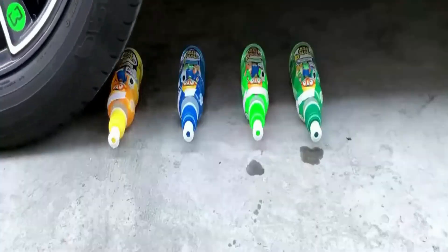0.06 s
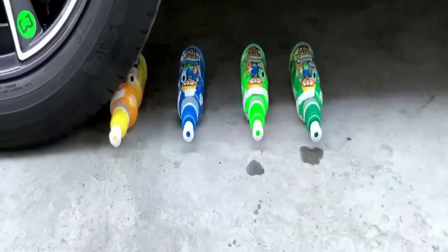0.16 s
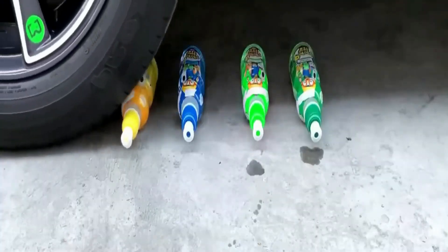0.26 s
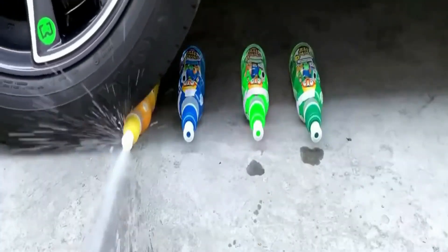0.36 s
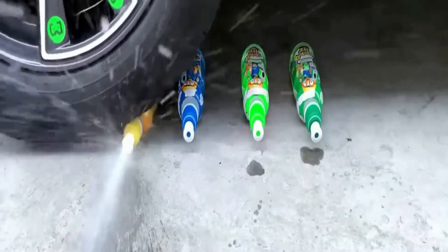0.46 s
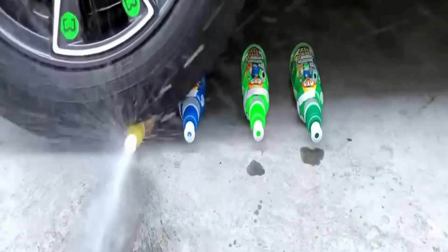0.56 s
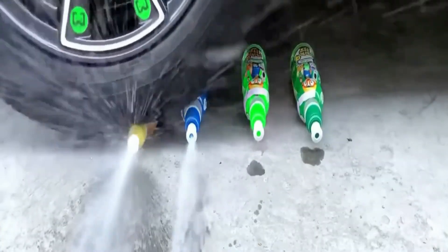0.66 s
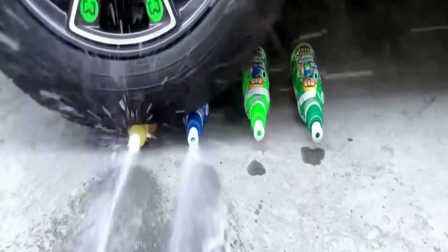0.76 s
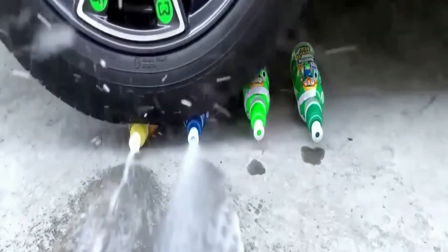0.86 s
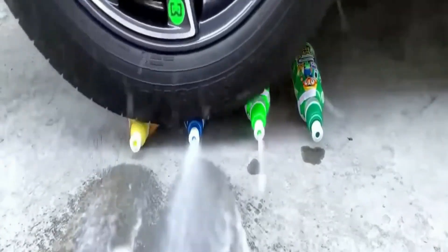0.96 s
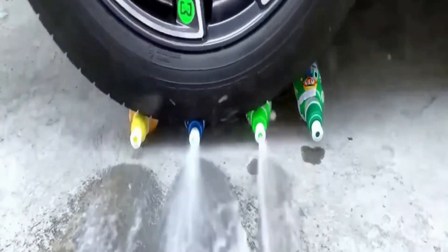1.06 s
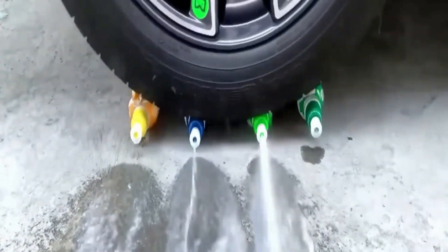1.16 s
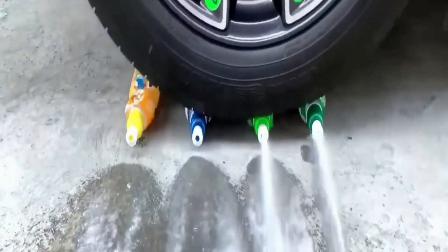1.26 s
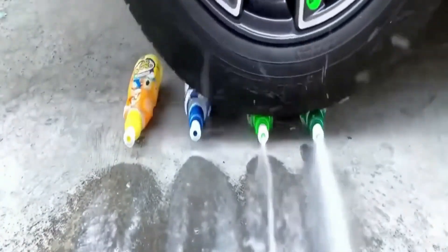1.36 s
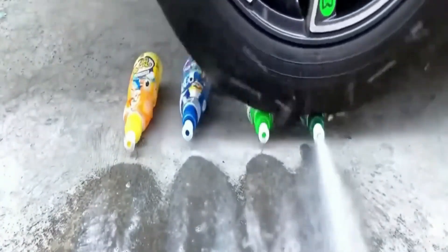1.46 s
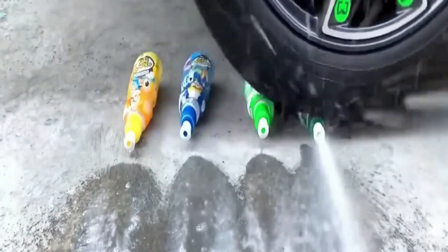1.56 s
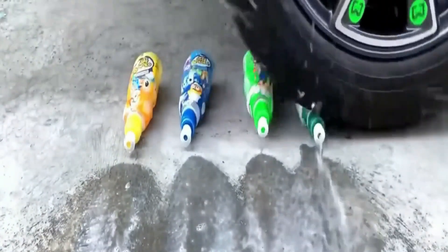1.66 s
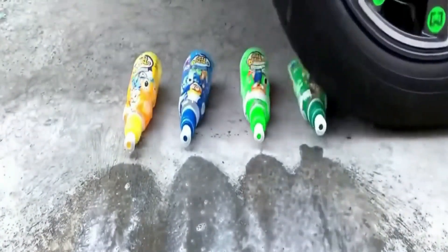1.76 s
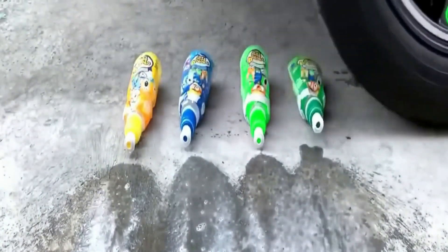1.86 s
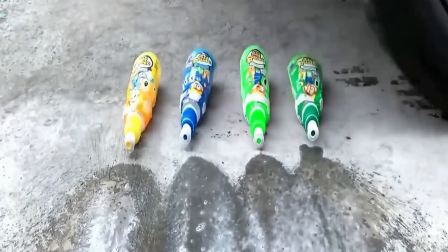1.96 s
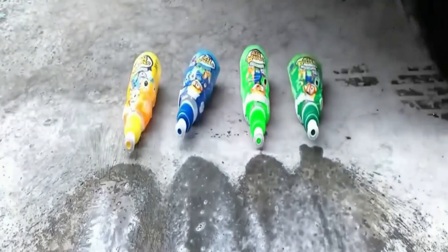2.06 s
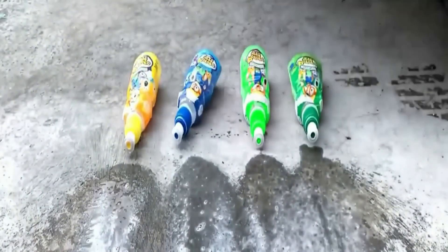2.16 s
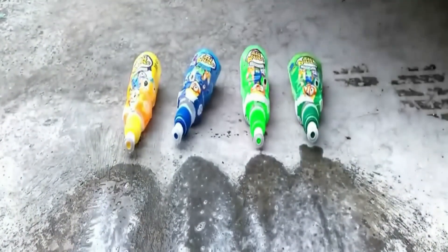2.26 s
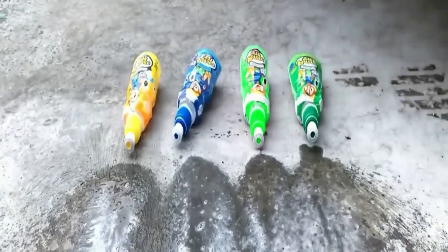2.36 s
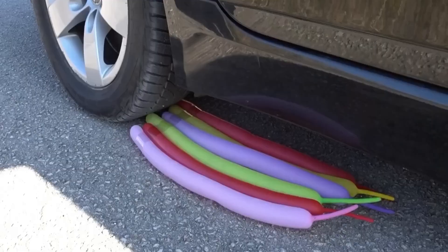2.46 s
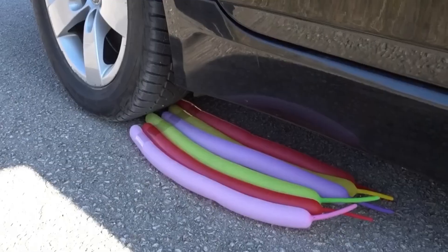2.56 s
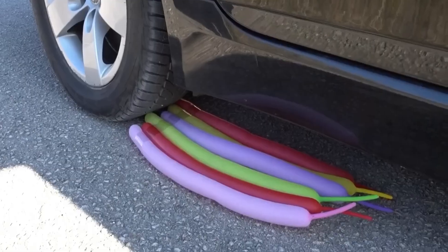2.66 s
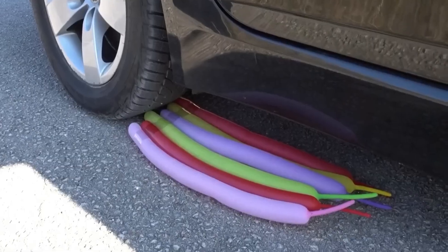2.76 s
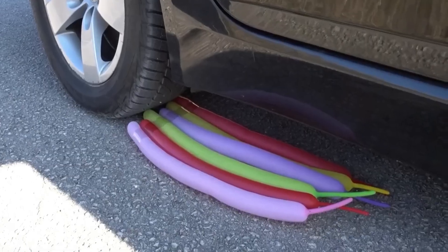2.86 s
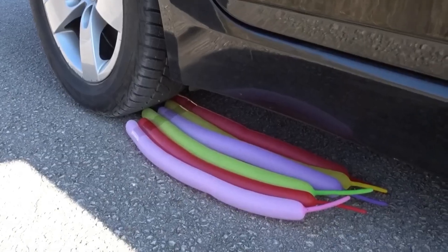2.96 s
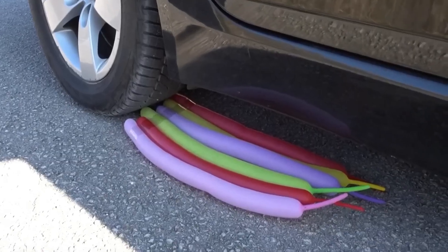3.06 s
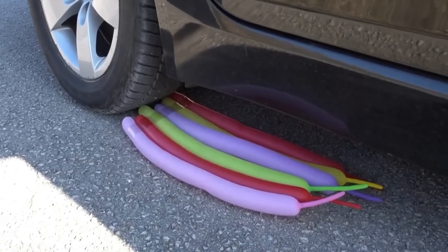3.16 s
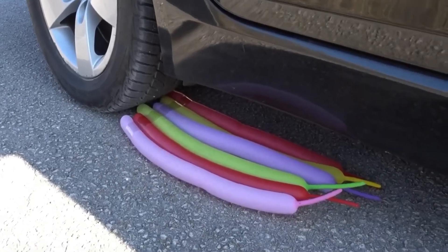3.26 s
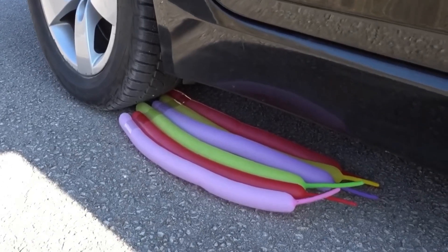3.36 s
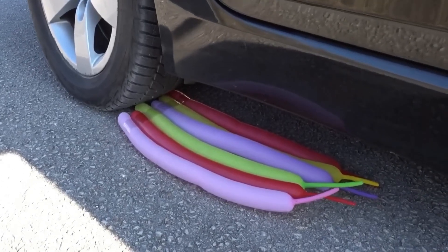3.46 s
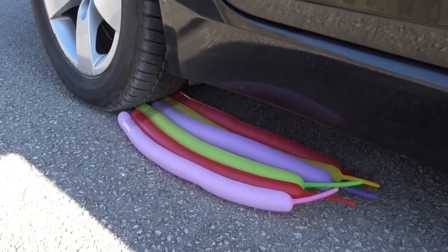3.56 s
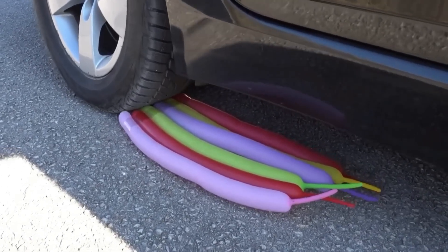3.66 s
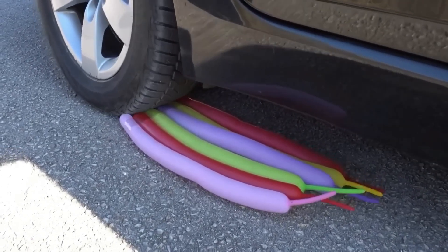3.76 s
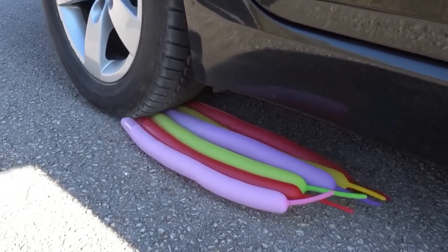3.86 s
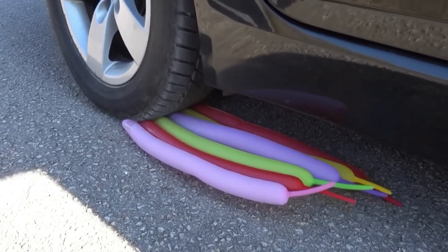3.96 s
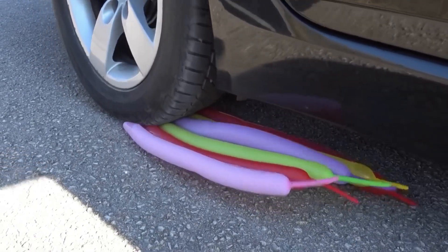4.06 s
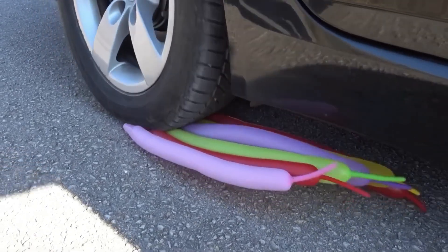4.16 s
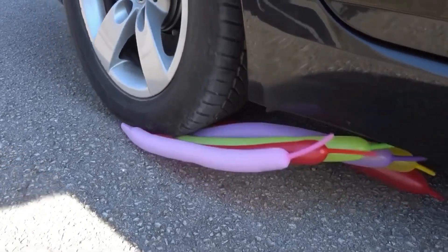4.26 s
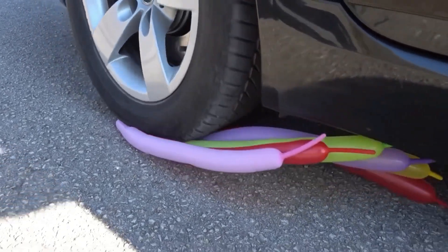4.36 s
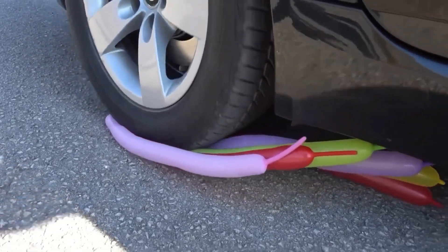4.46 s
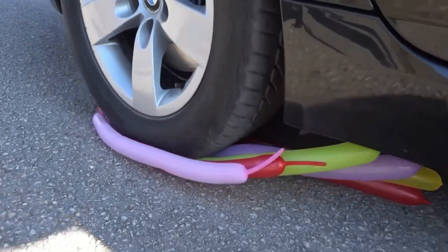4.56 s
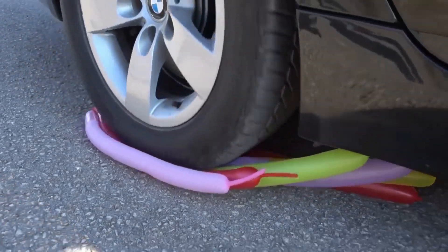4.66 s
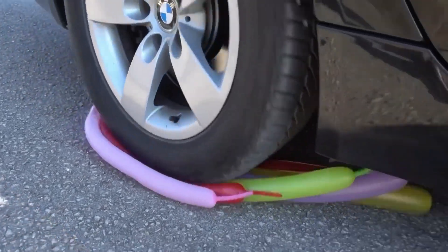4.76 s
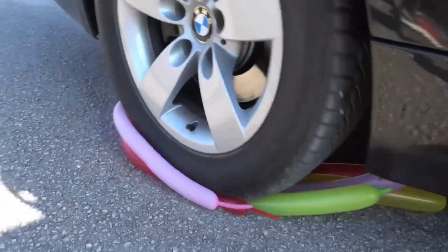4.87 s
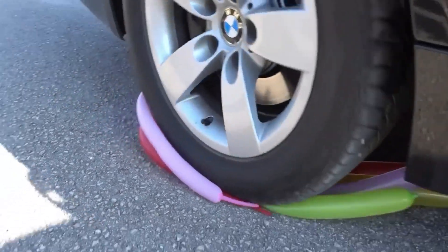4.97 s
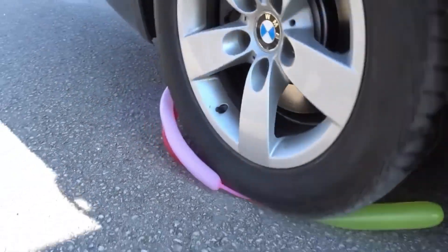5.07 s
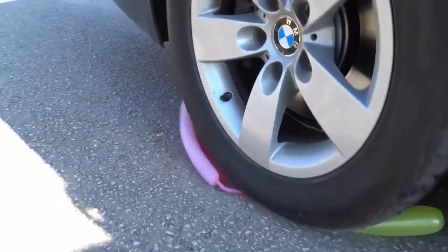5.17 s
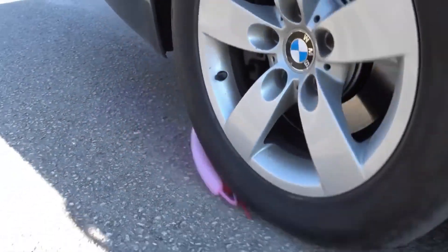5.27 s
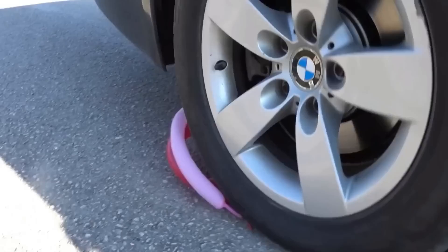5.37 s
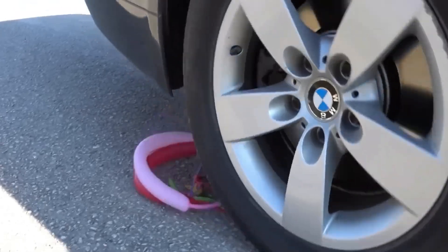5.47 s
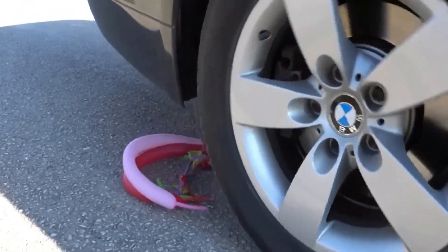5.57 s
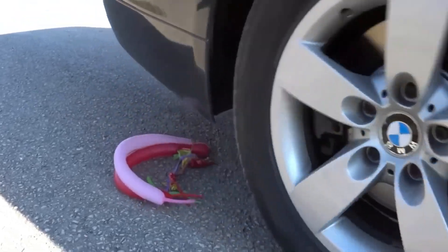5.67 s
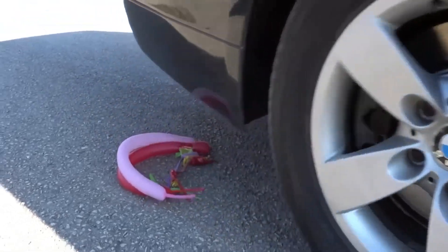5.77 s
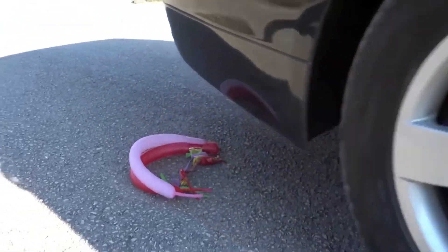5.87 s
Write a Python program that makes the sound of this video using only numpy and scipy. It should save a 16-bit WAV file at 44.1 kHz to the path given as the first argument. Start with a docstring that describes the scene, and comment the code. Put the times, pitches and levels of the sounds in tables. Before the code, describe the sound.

Close to the microphone, an engine idles and a tyre rumbles over four plastic drink bottles, which crack, hiss, gurgle and spatter on concrete in turn. An abrupt cut leads to a quieter outdoor place with wind buffeting the microphone; the tyre drags long balloons over asphalt with rasping, squeaks and a rising and falling squeal, then several pops.

```python
"""An idling engine and a rumbling tyre stand close to the microphone, outdoors; then four plastic drink bottles
crack under the tread, ring, squirt, gurgle and spatter on concrete. After a cut, wind eddies bump the
microphone and the tyre squeezes long balloons that rub, squeal and burst over asphalt. Filtered noise makes
rumble, hiss and thuds; gliding sines make squeals, bubbles and eddies; stick-slip pulses make the rubbing."""
import sys
import numpy as np
from scipy import signal
from scipy.fft import rfft, irfft
from scipy.io import wavfile

SR = 44100
rng = np.random.default_rng(int(sys.argv[2]) if len(sys.argv) > 2 else 0)


def to_wav(s):
    """Save 16-bit WAV."""
    ch = np.atleast_2d(s).T  # columns
    pcm = np.round(np.clip(ch, -1, 1) * 32767)  # PCM
    wavfile.write(sys.argv[1], SR, pcm.astype(np.int16))


N = 261072
T = np.arange(N) / SR
CUT_S = 2.455  # from the bottles to the balloons

# one squirt for each bottle: start_s, length_s, mist_db, spatter_db, gurgle_db (relative), gurgle_hz
SQUIRTS = [(0.421, 0.46, -19.5, -26, -24.5, 997), (0.601, 0.24, -45, -24.5, -19, 1592),
           (0.889, 0.46, -19, -23, -21, 1148), (1.164, 0.65, -20, -25.5, -23.5, 998)]
# plastic buckling under the tread: start_s, relative_db, body_hz
CRACKS = [(.313, -31, 458), (.376, -34, 850), (.409, -18, 668), (.422, -16, 680), (.461, -20, 654),
          (.499, -26.5, 747), (.574, -25, 580), (.865, -18, 693), (.995, -16, 1044), (1.148, -17, 957),
          (1.274, -15, 862), (1.306, -21, 700), (1.370, -23, 350), (1.46, -17.5, 443), (1.492, -23, 390),
          (1.541, -18, 772), (1.582, -23, 720), (1.642, -22, 860), (1.668, -23.5, 703), (1.712, -20.5, 760),
          (1.755, -13.5, 874), (1.782, -19, 896), (1.816, -16.5, 1343), (1.866, -16.5, 720),
          (1.872, -18, 374), (1.906, -16, 481), (1.935, -13.5, 691), (2.079, -28.5, 360), (2.108, -26, 360),
          (2.238, -41, 540)]


def undb(db):
    """Decibels to amplitude."""
    return 10 ** (np.asarray(db) / 20)


def unit(x):
    """Scale to an RMS of one."""
    return x / np.sqrt(np.mean(x ** 2) + 1e-18)


def curves(table):
    """Each column of a table joined by straight lines in time."""
    s, *columns = np.transpose(table)
    return [np.interp(T, s, c) for c in columns]


def gate(start, end, fade=0.0018):
    """One between two times, with short fades."""
    return np.clip((T - start) / fade, 0, 1) * np.clip((end - T) / fade, 0, 1)


def swell(start, rise, length, fall_db_per_s):
    """Rise, hold until the length is up, then die away."""
    fall_db = -fall_db_per_s * np.maximum(T - start - length, 0)
    return np.clip((T - start) / rise, 0, 1) * undb(fall_db)


def noise(size=N):
    """White noise, independent in the two channels."""
    return rng.standard_normal((2, size))


def walk(rate, size=N):
    """Random wander with a spread near 1, through `rate` new points a second."""
    knots = rng.standard_normal(4096)
    return unit(np.interp(T[:size] * rate, np.arange(len(knots)), knots))


def colour(x, points):
    """Shape by a (Hz, dB) spectrum that falls away beyond its ends."""
    hz, db = np.transpose(points)
    f = np.fft.rfftfreq(N, 1 / SR) + 1e-3
    skirt = np.minimum(f / hz[0], 1) ** 3 * np.minimum(hz[-1] / f, 1) ** 3
    gain = undb(np.interp(np.log(f), np.log(hz), db)) * skirt
    return unit(irfft(rfft(x) * gain, N))


def band(x, hz, spread):
    """Broad resonance from hz / spread to hz * spread."""
    spread = max(spread, 1.05)
    edges = [hz / spread, min(hz * spread, .47 * SR)]
    return unit(signal.sosfilt(signal.butter(2, edges, "band", fs=SR, output="sos"), x))


def low_pass(x, order, ripple_db, stop_db, hz):
    """Steep cut of everything above hz."""
    return signal.sosfilt(signal.ellip(order, ripple_db, stop_db, hz, fs=SR, output="sos"), x)


def add(out, s, x):
    """Mix a short sound in at time s."""
    i = max(int(s * SR), 0)
    out[..., i:i + x.shape[-1]] += x[..., :max(N - i, 0)]


def underbody(x, t60, direct=0.):
    """Dense reflections between road and car, different at each side of the microphone."""
    t = np.arange(SR // 12) / SR
    echoes = noise(len(t)) * undb(-60 * t / t60)
    echoes /= np.linalg.norm(echoes, axis=1, keepdims=True)
    echoes[:, 0] += direct
    return signal.oaconvolve(np.atleast_2d(x), echoes, axes=1)[:, :N] / np.hypot(1, direct)


def moving_underbody(x, t60, direct=0., count=3):
    """The reflection pattern keeps changing as the wheel rolls on."""
    shares = np.array([walk(22) for _ in range(count)])
    shares /= np.linalg.norm(shares, axis=0)
    return sum(share * underbody(x, t60, direct) for share in shares)


def specks(rate, scatter_db):
    """Random tiny impacts, `rate` a second on average, a few much larger than the rest."""
    hits = rng.random(N) < rate / SR
    sizes = undb(scatter_db * np.minimum(rng.exponential(size=N), 4))
    return unit(hits * rng.choice([-1, 1], N) * sizes)


def chirps(start, end, pitch_hz, spread, length, glide, glide_spread, scatter_db, count):
    """A swarm of short gliding rings scattered round a moving pitch."""
    out, age = np.zeros(N), np.linspace(0, 1, int(length * SR))
    shape = np.minimum(10 * age, 1) * undb(-30 * age)
    times, sizes = rng.uniform(start, end, count), rng.exponential(size=count)
    for when, (detune, bend), size in zip(times, rng.standard_normal((count, 2)), sizes):
        centre_hz = pitch_hz[min(int(when * SR), N - 1)]
        hz = min(centre_hz * np.exp(spread * detune), SR / 4)
        cycles = hz * length * age * (1 + (glide + glide_spread * bend) * age / 2)
        add(out, when, undb(scatter_db * min(size, 3)) * shape * np.sin(2 * np.pi * cycles))
    # unit level within the swarm's own span
    return unit(moving_underbody(out, t60=0.08)) * np.sqrt((end - start) * SR / N)


def bursts(table, spread, t60, snap_hz, snap_db, rise, tail_db, tail_t60):
    """A skin or shell gives way: a bright snap, a thud of moved air, and a short wash from under the car."""
    out, t = np.zeros((2, N)), np.arange(-SR // 20, SR // 2) / SR
    after = np.maximum(t, 0)
    decay = undb(-60 * after / t60) + undb(tail_db - 60 * after / tail_t60)
    shape = np.exp(np.minimum(t, 0) / rise) * decay
    for s, db, hz in table:
        body = band(noise(len(t)), hz, spread)
        snap = band(noise(len(t)), snap_hz, 2.27)
        add(out, s + t[0] + rise, undb(db + 3.0) * shape * (body + undb(snap_db) * snap))
    return out


def yard():
    """Distant outdoor noise; the sound of this layer turns dull above dull_hz at the end."""
    # spectrum of the outdoor noise: pitch_hz, level_db
    air_spectrum = [(15, -18.5), (25, 7), (81, -2), (178, -6.5), (480, -5.5), (685, -2), (740, 2),
                    (954, -15.5), (1400, -8), (2710, -13), (3320, -17), (4510, -17.5), (11000, -24.5),
                    (14300, -58.5), (22000, -120)]
    level_db, dull_hz, dull_start_s, dull_db_per_s = -50, 3200, 5.5, 37
    air = colour(noise() + .5 * noise()[0], air_spectrum) * undb(level_db + .5 * walk(6.1))
    low = signal.sosfiltfilt(signal.butter(3, dull_hz, fs=SR, output="sos"), air)
    return low + (air - low) * undb(-dull_db_per_s * np.maximum(T - dull_start_s, 0))


def eddies(table, lag, unrest, rush_db):
    """Each eddy is a gliding, restless pressure wave with a rush of air, reaching one port a moment late."""
    half_length_s = 0.014
    glide_scatter = 0.21  # octaves per half-length
    out, t = np.zeros((2, N)), np.arange(-SR // 8, SR // 8) / SR
    for s, db, hz in table:
        glide = glide_scatter * rng.standard_normal() * np.clip(t / half_length_s, -2, 2)
        rate = hz * 2 ** (glide + unrest * walk(199.9, size=len(t)))
        late = np.array([[lag], [0]]) * np.minimum(rate, 130)  # in cycles
        phase = 2 * np.pi * (np.cumsum(rate) / SR + rng.random() - late)
        eddy = np.sin(phase) + undb(rush_db) * band(noise(len(t)), 0.89 * hz, 1.99)
        add(out, s + t[0], undb(db) * eddy * np.exp(-(t / half_length_s) ** 2))
    return out


def wind(lag=0.0017, unrest=0.292, rush_db=-9, flutter_db=0.0, count=26):
    """Low noise flutters on the microphone throughout; strong and small eddies bump it after the cut."""
    # strong wind eddies on the microphone: peak_s, level_db, flutter_hz
    strong = [(3.365, -28, 94.6), (3.426, -19, 252), (3.445, -18.5, 123.2), (3.497, -21.5, 149.8),
              (3.547, -15, 102), (3.572, -14.5, 156.3), (3.607, -13.5, 78.3), (3.695, -10, 77.4),
              (3.705, -15.5, 192.5), (4.014, -25, 100.3), (4.315, -35.5, 278), (4.453, -16.5, 147.1),
              (4.79, -22.5, 220.5), (4.845, -24, 141.5), (4.905, -22, 199.6), (4.946, -14.5, 148.3),
              (5.042, -16.5, 257), (5.605, -16.5, 151.6), (5.705, -21.5, 170.1), (5.87, -38, 120.5),
              (5.886, -22.5, 261)]
    # strength of the breeze: time_s, level_db
    breeze = [(2.45, -41), (2.7, -65.5), (3.33, -66), (3.42, -32), (3.62, -29.5), (3.8, -36.5),
              (4.3, -36.5), (4.6, -52.5), (4.8, -30), (5.3, -36), (5.92, -30)]
    eddy_hz, eddy_db = 134.4, 8  # small eddies, level against the breeze
    breeze_db, = curves(breeze)
    flutter_spectrum = [(20, 0.0), (60, -0.5), (120, -2.5), (220, -15.5), (400, -22.5)]  # (Hz, dB)
    flutter = colour(noise() + 0.31 * noise()[0], flutter_spectrum) * undb(breeze_db + flutter_db)
    times = CUT_S + (T[-1] - CUT_S) * (np.arange(count) + rng.random(count)) / count
    weak = []
    for s, (size, detune) in zip(times, rng.standard_normal((count, 2))):
        db = np.interp(s, T, breeze_db) + eddy_db + 2.6 * size
        weak.append((s, db, eddy_hz * 2 ** (0.49 * detune)))
    return flutter + eddies(list(strong) + weak, lag, unrest, rush_db)


def engine():
    """Idling engine and belt lines waver in level and pitch, over the hiss of the engine bay."""
    # engine and belt lines: pitch_hz, level_db against the hum
    lines = [(58, -4), (112, -4), (598, -15.5), (960, -16), (1490, -20.5)]
    # spectrum of the engine bay: pitch_hz, level_db
    bay_spectrum = [(300, 0), (450, -6.5), (600, -2.5), (750, -7.5), (1100, -13.5), (1550, -10.5),
                    (2100, -16), (3200, -16), (6000, -26), (8300, -22), (15000, -30)]
    hum_db, hum_fall_db_per_s = -28.5, 8.5  # the engine moves away
    turn = np.cumsum(1 + 0.02 * walk(15)) / SR
    hum = 0
    for hz, db in lines:
        phase = 2 * np.pi * (hz * turn + rng.random((2, 1))) + .5 * walk(90)
        hum = hum + undb(db + 8.8 * np.tanh(walk(26))) * np.sin(phase)
    bay = colour(underbody(noise(), t60=0.0894, direct=0.49), bay_spectrum) * undb(-39.5 + walk(33))
    return hum * undb(hum_db - hum_fall_db_per_s * T) + bay


def tyre():
    """The tyre rumbles, dents set the air inside it ringing, and the car rocks."""
    # spectrum of the rumble: pitch_hz, level_db
    rumble_spectrum = [(18, 7.5), (32, 1.5), (50, -1.5), (100, -2), (150, -12.5), (300, -19.5),
                       (500, -22.5)]
    # dents that set the air inside the tyre ringing: start_s, level_db
    dents = [(0.404, -24.5), (0.47, -37), (1.14, -30.5), (2.04, -31), (2.229, -30)]
    rumble_db, rumble_rise_db_per_s = -30.5, 0.5  # the wheel gathers speed
    cavity_db, dent_rise_s, dent_hold_s, dent_fall_db_per_s = -40, 0.011, 0.02, 91
    sway_s, sway_hz, sway_db = 2.03, 25.9, -24.5  # the car rocks as the wheel drops off the last bottle
    rumble_level_db = rumble_db + rumble_rise_db_per_s * T + 3.9 * walk(5.4)
    rumble = colour(noise() + 0.5 * noise()[0], rumble_spectrum) * undb(rumble_level_db)
    ring = undb(cavity_db)
    for s, db in dents:
        ring = ring + undb(db) * swell(s, dent_rise_s, dent_hold_s, dent_fall_db_per_s)
    cavity = band(noise() + noise()[0], hz=202, spread=1.087) * ring
    sway = band(noise(), sway_hz, 1.31) * undb(sway_db) * swell(sway_s, 0.028, 0.33, 18)
    return rumble + sway + cavity


def rolling():
    """Tread on asphalt swells as the wheel comes near and fades as it leaves."""
    # spectrum of rolling on asphalt: pitch_hz, level_db
    tread_spectrum = [(260, -30), (450, -15), (686, -16.5), (746, -17), (905, -12.5), (2520, -14),
                      (4500, -28.5), (8000, -61), (10400, -78.5), (17600, -120)]
    tread_db, pass_s, near_db = -44, 5.44, 7  # loudest as the wheel passes
    approach_db_per_s, leave_db_per_s = 7, 31
    far_db = approach_db_per_s * np.maximum(pass_s - T, 0) + leave_db_per_s * np.maximum(T - pass_s, 0)
    level_db = tread_db + near_db - far_db + walk(30.6)
    return colour(noise(), tread_spectrum) * undb(level_db) * gate(3.0, 7, fade=0.66)


def knocks(rise=0.0027, ring_db=0):
    """Each crack rings the modes of the bottle, scaled to the body pitch of that crack."""
    # modes of a bottle: multiple of its body pitch, relative_db, t60_s
    modes = [(1, 1.5, 0.075), (1.6, -6.5, 0.08), (2.15, -5, 0.055), (3.2, -12.5, 0.075)]
    out, t = np.zeros((2, N)), np.arange(SR // 5) / SR
    for s, db, hz in CRACKS:
        for (ratio, mode_db, t60), phase in zip(modes, rng.random((len(modes), 2, 1))):
            fade = np.minimum(t / rise, 1) * undb(-60 * np.maximum(t - rise, 0) / t60)
            ring = np.sin(2 * np.pi * (hz * ratio * t + phase))
            add(out, s, undb(db + mode_db + ring_db) * fade * ring)
    return out


def plastic(click_hz=4200, crunch_db=-5):
    """The bottles crack and ring as they buckle and click as the tyre grips and frees them."""
    # bottle walls clicking as they are pinched or spring back: start_s, relative_db
    click_times = [(0.371, -39.5), (0.414, -30.5), (0.433, -30), (.497, -26), (.577, -30), (1.893, -20),
                   (1.935, -20.5), (2.06, -32), (2.102, -27), (2.157, -34), (2.238, -35.5)]
    cracks = bursts(CRACKS, spread=1.54, t60=0.11, snap_hz=3460, snap_db=-15.5,
                    rise=.003, tail_db=-27.5, tail_t60=0.26)
    clicks = bursts([(s, db, click_hz) for s, db in click_times], spread=3.25, t60=0.042, snap_hz=8050,
                    snap_db=-14, rise=0.0055, tail_db=-40, tail_t60=0.13)
    return undb(crunch_db) * cracks + knocks(ring_db=2.5) + clicks


def squirting(levels_db, rise, fall_db_per_s, lag=0.):
    """The power that each bottle puts into one part of the spray."""
    powers = []
    for (s, length, *_), db in zip(SQUIRTS, levels_db):
        powers.append((undb(db) * swell(s + lag, rise, length - lag, fall_db_per_s)) ** 2)
    return np.array(powers) + 1e-18


def spray():
    """Jets hiss as a fine mist, and their droplets spatter on the concrete."""
    # spectrum of the mist: pitch_hz, level_db
    mist_spectrum = [(5500, -17.5), (7400, -8), (8300, -5), (9500, -6), (11000, -5), (12800, -2.5),
                     (15500, -4)]
    # spectrum of the spatter: pitch_hz, level_db
    spatter_spectrum = [(1500, 3), (2000, -2), (3000, 0), (4000, -4), (5200, -6), (7000, -9.5)]
    # a jet surges as the tread presses harder: start_s, length_s, relative_db
    surges = [(0.495, .04, -20), (1.245, 0.077, -27)]
    mist_rise_s, mist_fall_db_per_s = 0.036, 121.5
    spatter_rise_s, spatter_fall_db_per_s = 0.18, 62  # drops build up more slowly than mist
    _, _, mist_db, spatter_db, _, _ = np.transpose(SQUIRTS)
    mist = np.sqrt(squirting(mist_db, mist_rise_s, mist_fall_db_per_s).sum(0))
    mist = mist + sum(undb(db - 4) * swell(s, .012, length, 220.5) for s, length, db in surges)
    spatter = np.sqrt(squirting(spatter_db, spatter_rise_s, spatter_fall_db_per_s).sum(0)) * undb(3)
    drops = unit(moving_underbody(specks(rate=2600, scatter_db=3.6), t60=.05))
    flow = undb(-10.5) * noise() + drops
    jets = colour(flow, mist_spectrum) * mist + colour(flow, spatter_spectrum) * spatter
    return jets * undb(0.35 * walk(61.3))


def hollows(swing_db=4):
    """Sputtering air rings each resonance of the half-empty bottles, swelling and drifting as walls fold."""
    # air in the half-empty bottles: pitch_hz, relative_db
    resonances = [(470, -9), (640, -4.5), (890, 0), (1080, 0.5), (1360, 1), (1560, -2), (2050, -7)]
    drift, width_hz = .032, 20
    out = 0
    for hz, db in resonances:
        phase = 2 * np.pi * np.cumsum(hz * np.exp(drift * walk(9))) / SR
        drive = np.array([walk(2 * width_hz) + 1j * walk(2 * width_hz) for _ in range(2)])
        ring = (drive * np.exp(1j * phase)).real
        out = out + ring * undb(db + swing_db * np.tanh(walk(13.77)))
    return unit(out)


def gurgle():
    """Air pockets bubble and splash through the nozzles and ring the hollow bottles in an uneven flow."""
    rise_s, fall_db_per_s = .11, 84.5
    lag_s = 0.083  # air reaches the nozzle after the liquid
    sputter_db, sputter_db_per_s = 1.1, 1  # the flow grows more uneven as the bottles empty
    gurgle_db, gurgle_hz = np.transpose(SQUIRTS)[4:]
    pockets = squirting(gurgle_db, rise_s, fall_db_per_s, lag_s)
    pitch_hz = gurgle_hz @ pockets / pockets.sum(0)  # stronger nozzles weigh more on the pitch
    bubbles = chirps(.38, 2.2, pitch_hz, spread=.32, length=.12, glide=.03, glide_spread=.06,
                     scatter_db=2.8, count=600)
    crackle = unit(underbody(specks(rate=190, scatter_db=1.2), t60=0.04))
    splash_spectrum = [(150, 1.5), (400, 1.5), (1000, -0.5), (1600, -11.0), (2200, -3.0)]  # (Hz, dB)
    splash = colour(crackle + 0.53 * noise(), splash_spectrum)
    mix = undb(-1.5) * bubbles + undb(-2.5) * splash + undb(-2) * hollows()
    sputter = undb((sputter_db + sputter_db_per_s * T) * np.tanh(walk(55)))
    return mix * np.sqrt(pockets.sum(0)) * sputter


def glugs(glug_db=-1, rise=0.0057, fall_db_per_s=500):
    """Large air pockets ring briefly in the nozzles, as narrow bands of noise."""
    # large air pockets gulping through a nozzle: start_s, length_s, relative_db, pitch_hz
    gulps = [(0.571, 0.055, -23, 940), (0.648, 0.078, -20, 1170), (0.719, 0.11, -19.5, 2070),
             (0.774, 0.052, -19.5, 1320), (0.989, .02, -16, 1075), (1.087, 0.037, -17.5, 1294),
             (1.184, 0.033, -19, 1015), (1.201, 0.023, -29, 605), (1.263, .015, -22, 1365),
             (1.317, 0.04, -25, 1000), (1.555, 0.026, -23, 1110), (1.626, 0.047, -18, 1540),
             (1.639, 0.034, -19.5, 880), (1.704, .015, -21.5, 1560), (1.76, .04, -24, 876),
             (1.773, 0.016, -24, 1500), (1.812, 0.01, -15, 1367)]
    out = 0
    for s, length, db, hz in gulps:
        out = out + band(noise(), hz, 1.035) * undb(db + glug_db) * swell(s, rise, length, fall_db_per_s)
    return out


def stick_slip(slip_hz, wander, jitter, count=5):
    """Several patches of latex catch and let go, each at its own restless rate, and share the load."""
    out, loads = 0, undb(1.8 * np.array([walk(25) for _ in range(count)]))
    for load in loads / np.linalg.norm(loads, axis=0):
        rate = slip_hz * np.exp(wander * walk(18) + jitter * walk(500))
        slips = np.diff(np.floor(np.cumsum(rate) / SR), prepend=0)
        out = out + slips * load * undb(2 * walk(400)) / np.sqrt(rate)  # quicker slips are smaller
    return out


def rubbing():
    """Slips rasp and squeak in the stretched skins, tick on grit and groan in the air inside the balloons."""
    # balloons dragged under the tread: time_s, rubbing_db
    drag = [(3.62, -54), (3.9, -39), (4.05, -29), (4.22, -32.5), (4.34, -30), (4.44, -22.5), (4.487, -20),
            (4.515, -17), (4.65, -26.5), (4.70, -19), (4.8, -19), (4.9, -17), (5.02, -21.5), (5.11, -17),
            (5.215, -31), (5.272, -24), (5.292, -16), (5.322, -16.5), (5.365, -35), (5.41, -37),
            (5.45, -35), (5.486, -35)]
    # spectrum of rubbed latex: pitch_hz, level_db
    latex_spectrum = [(1060, -23), (1800, -1.5), (2000, 3), (3320, 0), (3400, -3), (4200, 1.5),
                      (6380, -5.5), (7360, -0.5), (11000, -8), (14300, -79), (22000, -120)]
    # spectrum of the groan: pitch_hz, level_db
    groan_spectrum = [(240, 0.5), (480, 3), (750, 3), (1150, 1), (1400, -1.5), (1850, -5.5), (2400, -17.5),
                      (3000, -8)]
    # latex catching on grit: pitch_hz, relative_db
    grit_bands = [(1200, -5), (2500, 0), (4500, 1.5), (8000, -2)]
    rasp_db, release_db_per_s = 0.5, 321
    groan_db, groan_growth = -18, 0.49  # the groan gains this many dB for each dB of rubbing
    relief_db, relief_s, relief_width_s = 14, 4.553, 0.027  # rubbing eases while the skin slides and sings
    # the tread first drags a balloon over the asphalt
    scrape_s, scrape_length_s, scrape_hz, scrape_db = 3.72, 0.041, 1360, -34
    drag_db = curves(drag)[0] - relief_db * np.exp(-((T - relief_s) / relief_width_s) ** 2)
    slips = unit(moving_underbody(stick_slip(slip_hz=520.6, wander=.45, jitter=.07), t60=0.017))
    squeaks = chirps(3.6, 5.55, np.full(N, 4800.), spread=.5, length=.06, glide=0, glide_spread=.02,
                     scatter_db=2.5, count=1400)
    creaks = chirps(3.6, 5.55, np.full(N, 1700.), spread=.35, length=.08, glide=0, glide_spread=.08,
                    scatter_db=2.5, count=400)
    grit = 0
    for hz, db in grit_bands:
        ticks = moving_underbody(specks(rate=100, scatter_db=0.), t60=.025)
        grit = grit + undb(db) * band(ticks, hz, 1.4)
    skins = undb(-1.0) * colour(slips, latex_spectrum) + undb(-8.0) * colour(noise(), latex_spectrum)
    skins = skins + undb(-4.5) * squeaks + undb(-7.0) * creaks + undb(-3.5) * unit(grit)
    groan = colour(slips + undb(-13) * noise(), groan_spectrum)
    rubbed = skins * undb(rasp_db + drag_db) + groan * undb(groan_db + groan_growth * drag_db)
    stutter = undb(1.2 * walk(110) + 0.45 * walk(17))  # the bundle shifts in small jerks
    contact = swell(drag[0][0], 0.12, drag[-1][0] - drag[0][0], release_db_per_s)
    scrape = band(slips, scrape_hz, 1.7) * undb(scrape_db) * swell(scrape_s, .025, scrape_length_s, 170)
    return rubbed * stutter * contact + scrape


def sing(hz, rough, overtone_db=-7):
    """Latex slipping fast enough to give a tone; taut skin slips more sharply."""
    phase = 2 * np.pi * np.cumsum(hz * (1 + rough * walk(600))) / SR
    overtone = undb(overtone_db) * np.minimum(hz / 4000, 1) ** 2 * np.sin(2 * phase)
    return (np.sin(phase) + overtone) * undb(1.2 * walk(200))


def squeals():
    """One long squeal arches with the tension of the skin; short squeaks glide around it."""
    # the long squeal of the tautest balloon: time_s, pitch_hz, relative_db
    arch = [(4.505, 3620, -14), (4.517, 3560, -9.5), (4.533, 4020, -16.5), (4.56, 4850, -17),
            (4.585, 5620, -26), (4.604, 5940, -25), (4.626, 6070, -19.5), (4.661, 5800, -32),
            (4.677, 5150, -17.5), (4.69, 4080, -17), (4.708, 3330, -16), (4.719, 2500, -17),
            (4.738, 2350, -26)]
    # brief squeaks of the other balloons: start_s, length_s, pitch_hz, glide in octaves per s, relative_db
    short_squeaks = [(4.529, 0.05, 6680, 5.5, -23), (4.591, 0.015, 2000, -4, -15.5),
                     (4.666, .014, 10960, -3.5, -19), (4.686, 0.025, 7650, -2, -19),
                     (4.806, 0.052, 7460, 3.5, -22.5), (5.234, 0.033, 1572, 6.5, -22)]
    squeal_rough, sag_rough, squeak_rough = 0.011, 0.05, 0.07  # pitch scatter as a fraction
    hz, db = curves(arch)
    sag = np.sqrt(1 - hz / np.maximum.accumulate(hz))  # the squeal breaks up as the skin goes slack
    level = undb(db + 5 * sag * np.tanh(walk(180)))
    out = sing(hz, squeal_rough + sag_rough * sag) * level * gate(arch[0][0], arch[-1][0])
    for s, length, hz, glide, db in short_squeaks:
        gliding_hz = hz * 2 ** (glide * np.clip(T - s, 0, length))
        out += sing(gliding_hz, squeak_rough) * undb(db) * gate(s, s + length, fade=0.0049)
    return undb(5.0) * underbody(out, t60=0.04, direct=0.41)


def rubber(boom_hz=540, boom_db=-7.0, boom_fall_db_per_s=200):
    """The tread scuffs, latex snaps free, and bursting balloons boom under the car."""
    # rubber scuffing on asphalt: start_s, relative_db, body_hz
    scuff_times = [(2.472, -37.5, 1280), (2.492, -42.5, 1370), (3.348, -37, 784), (3.390, -43.5, 617),
                   (3.417, -47, 600), (3.48, -51, 600), (3.541, -36, 680), (3.64, -40.5, 690),
                   (3.697, -40, 560), (3.731, -46, 1420)]
    # latex snapping free of the tread: start_s, relative_db, body_hz
    snap_times = [(3.919, -22.5, 2000), (3.931, -24, 1200), (4.11, -21, 1320), (4.187, -37, 1200),
                  (4.325, -33, 1390), (4.425, -26, 2270), (4.475, -19, 1760), (4.508, -19, 3000),
                  (4.6, -23, 1800), (4.656, -20, 1806), (4.785, -24.5, 1200), (4.895, -20.5, 1300),
                  (4.95, -24, 1600), (5.04, -24, 1100), (5.118, -12, 2200)]
    # balloons bursting: start_s, relative_db, body_hz, boom_length_s
    pop_times = [(5.117, -12, 900, 0.07), (5.137, -21.5, 1000, .01), (5.162, -18, 650, 0.015),
                 (5.323, -8, 1290, 0.0033)]
    scuffs = bursts(scuff_times, spread=1.9, t60=0.1, snap_hz=5030, snap_db=-19.5,
                    rise=0.0037, tail_db=-14, tail_t60=0.14)
    snaps = bursts(snap_times, spread=1.78, t60=0.042, snap_hz=5050, snap_db=-1.0,
                   rise=0.0044, tail_db=-25.5, tail_t60=0.12)
    pops = bursts([row[:3] for row in pop_times], spread=1.93, t60=0.018, snap_hz=5050, snap_db=-16.0,
                  rise=.0027, tail_db=-8.0, tail_t60=0.16)
    boom_level = 0
    for s, db, _, hold in pop_times:
        boom_level = boom_level + undb(db + boom_db) * swell(s, 0.0074, hold, boom_fall_db_per_s)
    return scuffs + snaps + pops + band(noise(), boom_hz, 2.54) * boom_level


def scene():
    """Bottles on concrete, then a cut to balloons on asphalt."""
    car = (engine() + tyre()) * gate(-1, CUT_S)
    liquid = (spray() + gurgle()) * gate(0, 2.17, fade=0.033)  # until the last drops land
    first = car + liquid + glugs() + plastic()
    second = (yard() + rolling() + rubbing() + squeals() + rubber()) * gate(CUT_S - .008, 6)
    # the balloon scene is duller at the very top
    return first + wind() + low_pass(second, 12, .2, 80, hz=11150)


def record(dry):
    """The loudest peaks overload the recorder, which cuts the top."""
    return low_pass(np.clip(dry, -1, 1), 10, .2, 70, hz=15700)


dry = scene()
out = record(dry)
to_wav(out)
```